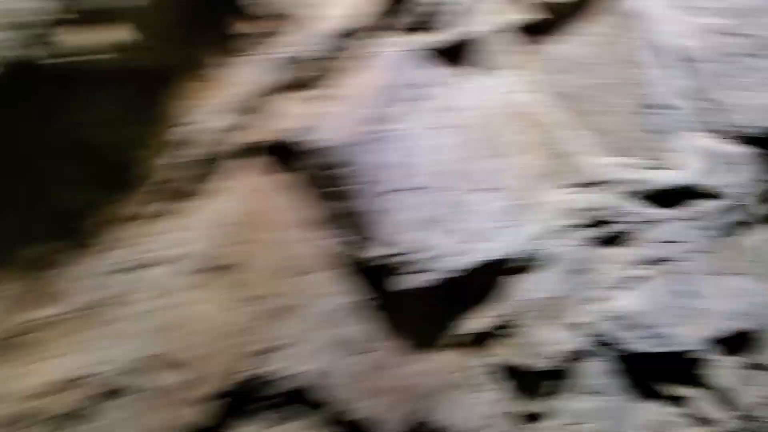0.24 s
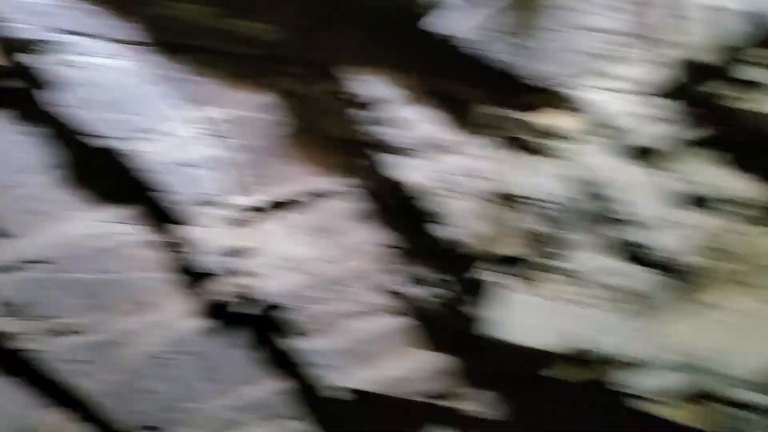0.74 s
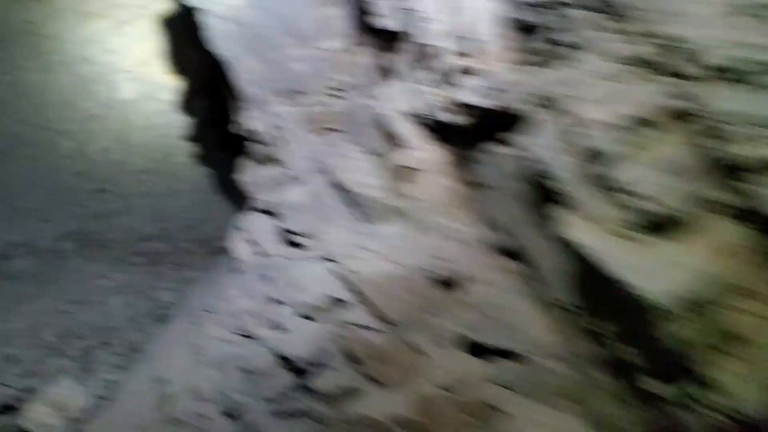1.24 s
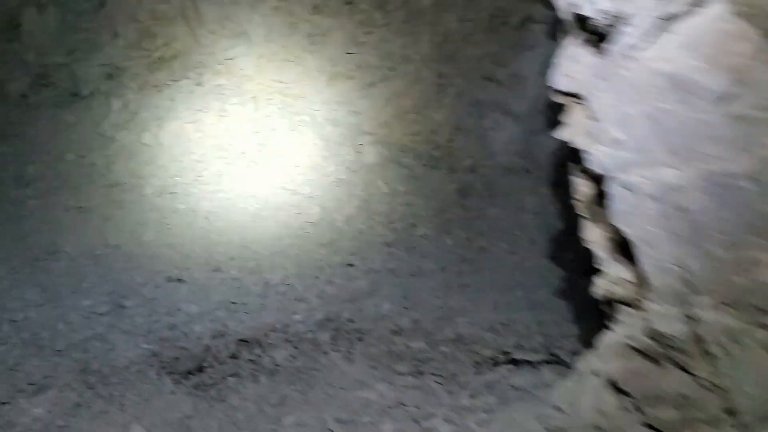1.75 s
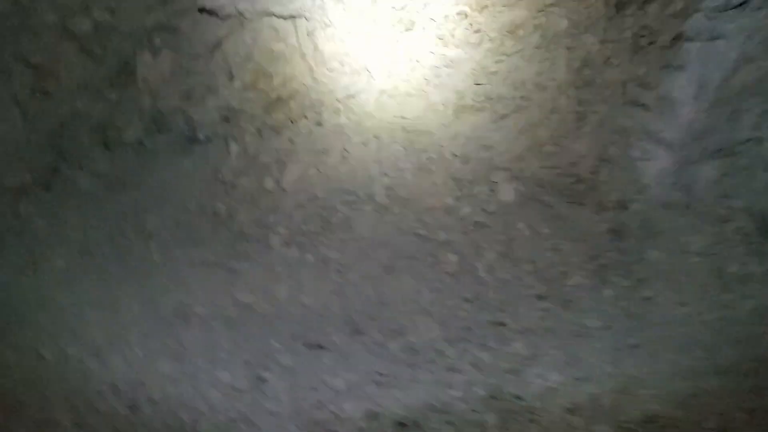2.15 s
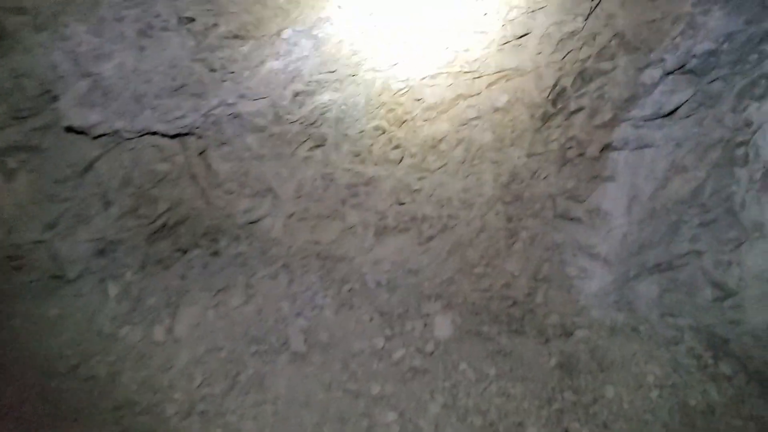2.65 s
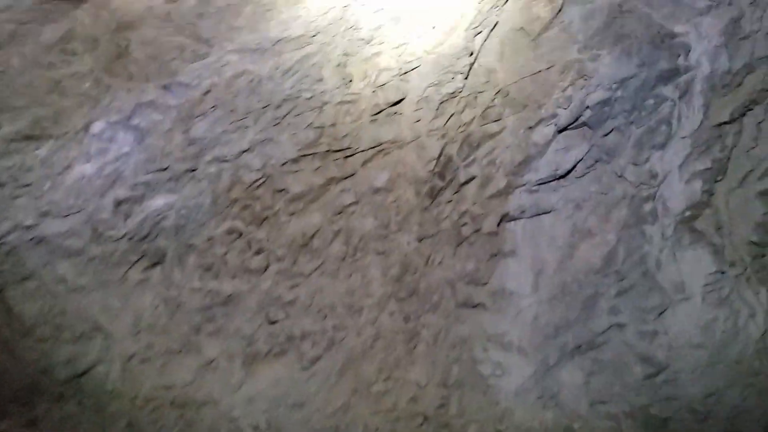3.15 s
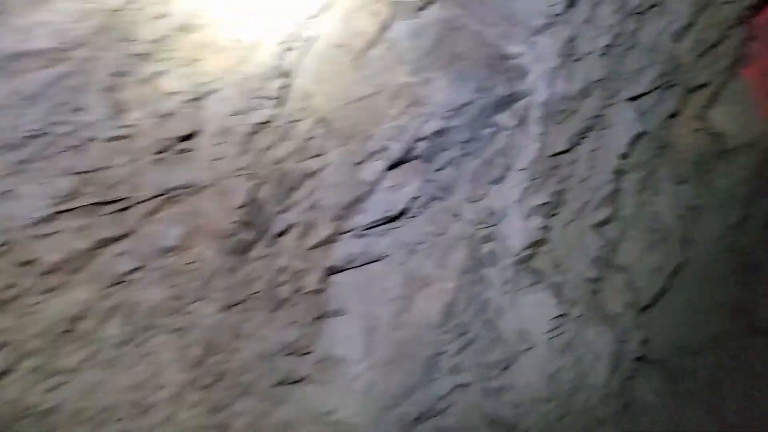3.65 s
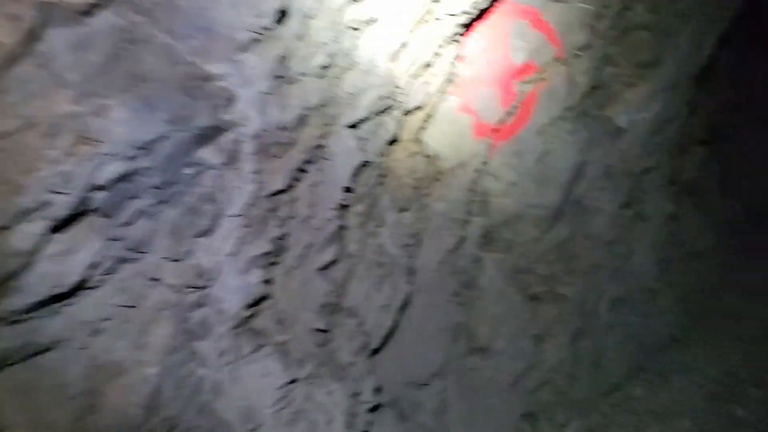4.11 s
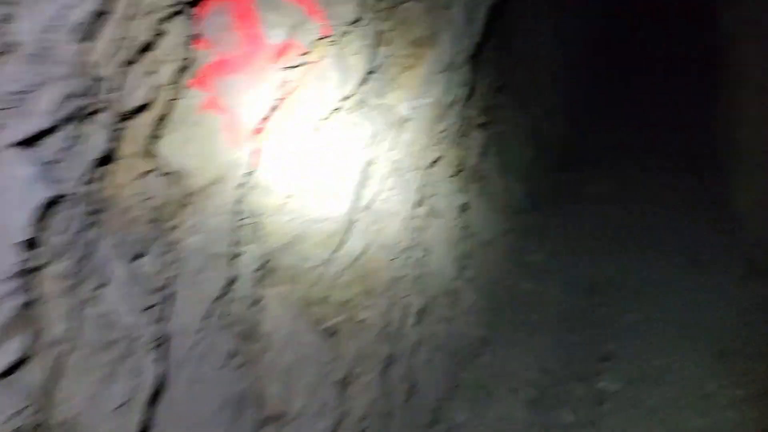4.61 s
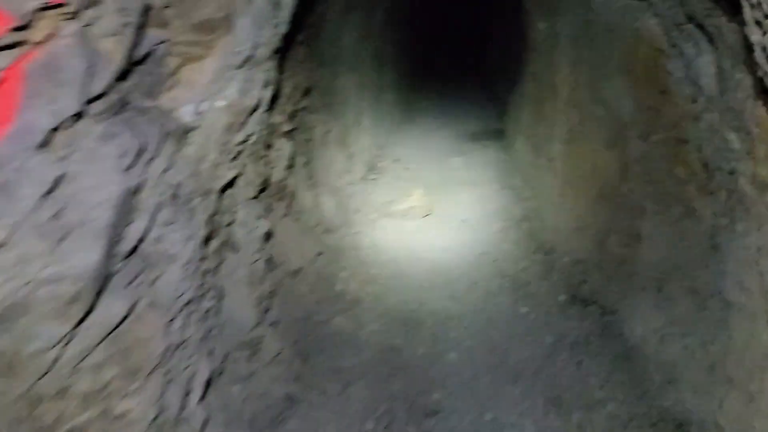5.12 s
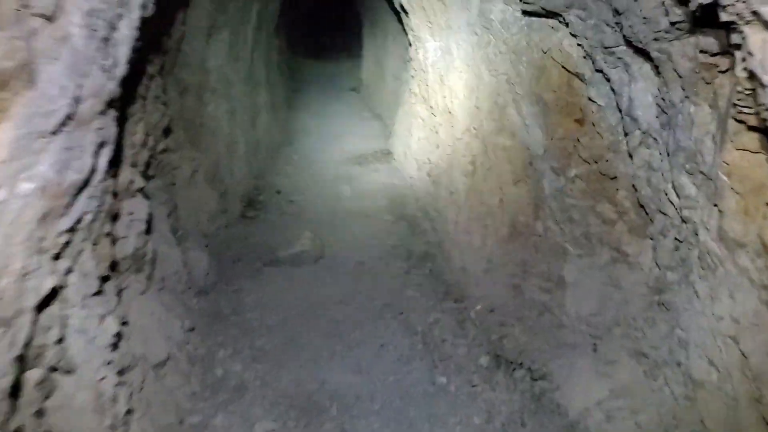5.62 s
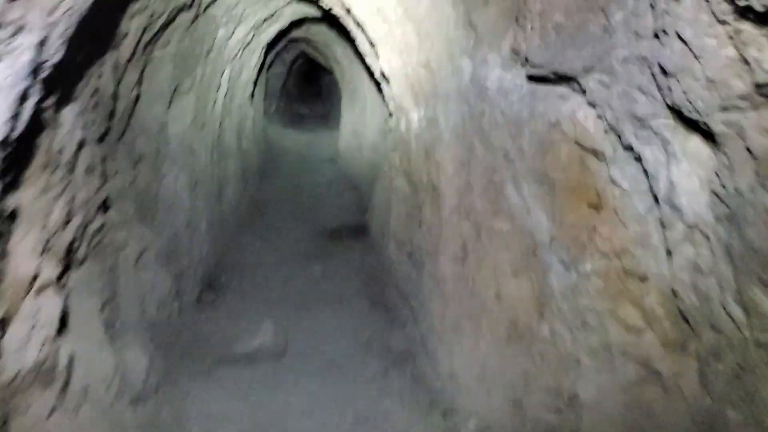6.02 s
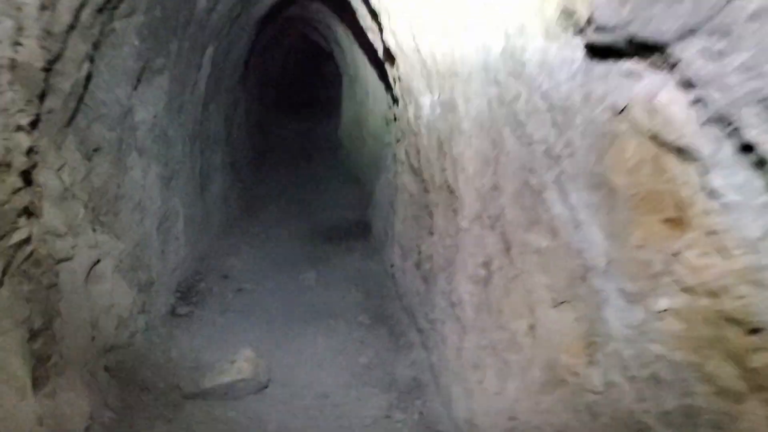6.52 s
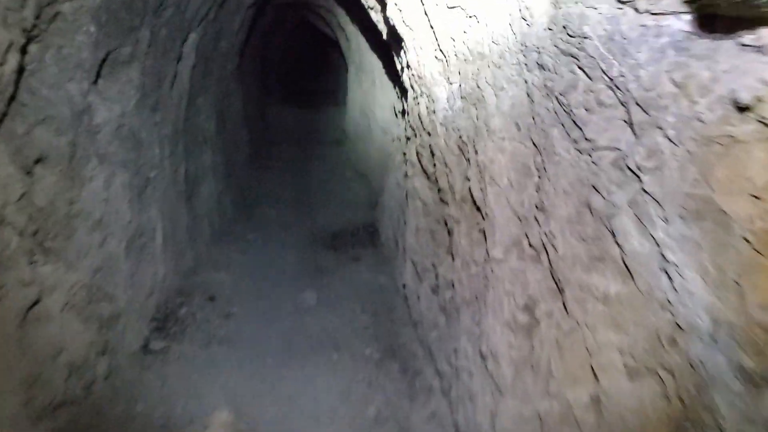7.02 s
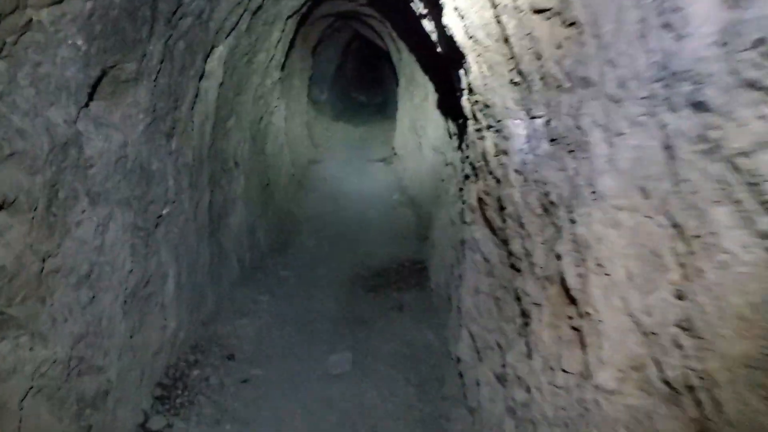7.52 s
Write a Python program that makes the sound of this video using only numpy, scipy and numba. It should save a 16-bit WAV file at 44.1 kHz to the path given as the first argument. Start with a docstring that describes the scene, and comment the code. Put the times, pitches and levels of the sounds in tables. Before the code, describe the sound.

A close, hand-held perspective in a narrow rock tunnel, with faint low rumble and soft hiss throughout. From 0 to 2 s boots shuffle on loose stones: a soft thud at the start, small clicks and knocks around 0.4-0.8 s, then a brighter gravel slip near 1.2 s. At about 2.1 s a heavier step crunches down, with further steps near 2.9 and 3.5 s, the latter with a sharp rock knock. Around 4.4-4.6 s a thud and several hollow clacks stand out. Dense, bright crunches follow at 5.2-5.4, 5.9 and 6.5 s, then clacking stones at 7.1 s and a last short step near 7.7 s. Small stones and grit trickle between steps. The walls give a short tail; the left side is open and crisp, the right muffled, with low handling bumps.

```python
"""In a narrow mine tunnel, over faint rumble and hiss, boots shuffle on loose rock and gravel, then
from about 2 s walk in heavier steps: each load of the ground is a crowd of ticks at their own pitches.
Heels and heavy rocks thud as low rings, single rocks knock and shed grit; the rock walls add a short tail.
The hand-held camera's left microphone is open and close to the direct sound; the grip muffles the right
one, dull and faint, but it feels the low bumps of the housing more strongly."""
import sys
import numpy as np
from scipy import signal
from scipy.fft import rfft, irfft, next_fast_len
from scipy.io import wavfile
from scipy.ndimage import uniform_filter1d
from numba import njit

SR = 44100
rng = np.random.default_rng(int(sys.argv[2]) if len(sys.argv) > 2 else 0)


def transcribe(signal):
    """Save signal, clipped to [-1, 1], as a 16-bit WAV file at the path in sys.argv[1]."""
    frames = np.atleast_2d(signal).T
    limited = np.clip(frames, -1, 1)
    pcm = np.round(limited * 32767).astype(np.int16)
    wavfile.write(sys.argv[1], SR, pcm)


N = 342304


def undb(db):
    """dB to gain."""
    return 10 ** (np.asarray(db) / 20)


def on_log(hz, table, axis=1):
    """Read one column of a table on a log-frequency axis."""
    table = np.array(table)
    return np.interp(np.log(np.maximum(hz, 1)), np.log(table[:, 0]), table[:, axis])


def colour(x, table, axis=1):
    """Filter by a table of dB against frequency."""
    size = next_fast_len(N)
    gain = undb(on_log(np.fft.rfftfreq(size, 1 / SR), table, axis))
    return irfft(rfft(x, size) * gain, size)[:N]


def walk(rate):
    """Wandering level: a new random value every 1 / rate s, joined by slewing."""
    k = int(SR / rate)
    held = np.repeat(rng.standard_normal(N // k + 1), k)
    return uniform_filter1d(held, k)[:N]


@njit
def ring(n, start, turn, decay, size, rise):
    """Sum of decaying sines that swell over a brief contact; turn in radians, decay in nepers a sample."""
    out = np.zeros(n)
    for k in range(len(start)):
        z, p = size[k] + 0j, np.exp(1j * turn[k] - decay[k])
        soft, q = 1., np.exp(-rise * decay[k])
        for i in range(start[k], min(n, start[k] + int(6 / decay[k]))):
            out[i] += z.imag * (1 - soft)
            z, soft = z * p, soft * q
    return out


def ticks(s, hz, t60, size, rise=7.9):
    """Short rings at times s; a larger rise shortens the contact relative to the decay."""
    start = (s * SR).astype(np.int64)
    return ring(N, start, 2 * np.pi * hz / SR, np.log(1000) / (t60 * SR), size, 1. * rise)


# still air and circuit hiss at each microphone, before its swell: pitch_hz, left_db, right_db [dB per Hz]
STILL_AIR = [(20, -57, -107), (44, -71, -73.5), (67.5, -67.5, -64.5), (110, -83, -93), (275, -90.5, -102),
             (820, -99.5, -115), (1980, -108, -120), (6300, -104, -128), (7360, -118, -133),
             (10200, -114, -130), (14500, -124, -125)]


def still_air(swell_db=2.5, swell_hz=3.8):
    """Faint rumble and hiss: coloured noise, unrelated at the two ports, swelling a little."""
    ports = []
    for column in (1, 2):
        noise = colour(rng.standard_normal(N), STILL_AIR, axis=column) * np.sqrt(SR / 2)
        ports.append(noise * undb(swell_db * walk(swell_hz)))
    return np.array(ports)


# a boot loads the gravel: start_s (weight lands), rise_s, hold_s, level_db (grit, relative),
# change_db (grit, over the hold), coarse_db (coarse stones above grit)
STEPS = [(0.512, 0.04, 0.1, -68.5, 4, 16.5), (1.049, 0.11, 0.14, -60, -14, 15.5),
         (1.198, 0.03, 0.11, -45, -13, 9), (1.399, 0.098, 0.088, -52.5, -1.5, 11.5),
         (2.108, 0.097, 0.03, -44.5, 4.5, 7.5), (2.178, 0.038, 0.17, -34.5, -13.5, 3),
         (2.617, 0.028, 0.037, -48.5, -20, 4), (2.9, 0.049, 0.13, -41.5, 5, 7),
         (3.518, 0.034, 0.031, -47, -8, 12), (3.671, 0.16, 0.14, -52.5, 7, 8),
         (4.441, 0.012, .2, -38, -6.5, 6), (4.837, 0.009, 0.18, -54, -8.5, 8.5),
         (5.188, 0.054, 0.046, -33, -5.5, 0), (5.307, 0.083, 0.023, -31.5, -8.5, 9.5),
         (5.38, .03, 0.14, -51.5, 2.5, -25), (5.926, 0.045, 0.13, -37, 3.5, 9.5),
         (6.534, 0.061, 0.087, -31.5, -1.5, 8.5), (7.077, 0.32, 0.053, -44, -3, 10),
         (7.152, 0.033, 0.1, -36, -2, 6.5), (7.678, 0.011, 0.023, -45.5, -13, 13.5)]
# faint shuffle of shifting feet between the steps: start_s, level_db (grit, relative)
SHUFFLE = [(0, -56.5), (0.25, -94), (0.45, -64), (0.92, -68.5), (1.6, -58.5), (1.9, -76), (2.05, -61.5),
           (2.8, -59.5), (3.42, -64.5), (3.9, -70.5), (4.35, -70), (4.42, -57), (5.1, -60.5), (5.75, -59),
           (6.4, -57), (6.85, -62.5), (7.76, -63)]
SHUFFLE_COARSE_DB = 5
RISE_DB, RELEASE_DB_PER_S = 30, 253  # climb during the rise; fall once the boot lifts
COARSE_GROWTH_DB_PER_S = 10  # coarse stones give way later than the grit
MIDDLE_LOAD_DB = -41  # grit level at which the ground has its plain colour


def load(s):
    """Grit level and coarse share (dB) at times s: each step rises, holds and releases over the shuffle."""
    start, rise, hold, db, change_db, coarse_db = (c[:, None] for c in np.transpose(STEPS))
    since = s - start
    grit = db + RISE_DB * np.minimum(since, 0) / rise
    grit = grit + change_db * np.clip(since / hold, 0, 1)
    grit = grit - RELEASE_DB_PER_S * np.maximum(since - hold, 0)
    coarse = grit + coarse_db + COARSE_GROWTH_DB_PER_S * np.maximum(since, 0)
    shuffle = np.interp(s, *np.transpose(SHUFFLE))

    def total(steps, under):
        """Add the powers of all the steps and the shuffle under them."""
        return 10 * np.log10(np.sum(undb(steps) ** 2, axis=0) + undb(under) ** 2)

    grit_db = total(grit, shuffle)
    return grit_db, total(coarse, shuffle + SHUFFLE_COARSE_DB) - grit_db


# colour of the stones' ticks: pitch_hz, level_db (relative)
STONES = [(70, 10), (160, -7), (420, 0.5), (850, 0.5), (1600, -5.5), (3000, -5), (6000, -1.5),
          (10000, -11.5), (16000, -22)]
COARSE_HZ = 1800  # stones pitched below this count as coarse, with a gradual border


def stone_size(hz, coarse_db):
    """Amplitude of a tick by its pitch; the coarse stones have their own share of the load."""
    coarse = 1 / (1 + (hz / COARSE_HZ) ** 4)
    return hz / 1000 * undb(on_log(hz, STONES) + coarse * coarse_db)


def pitch(u):
    """Even spread over the octaves of the stone table."""
    return STONES[0][0] * (STONES[-1][0] / STONES[0][0]) ** u


def bursts(per_s=70, fade_s=0.017, rest=0.36):
    """Log level of sudden slips at random moments that die away; mean 0, spread 1."""
    slips = (rng.random(N) < per_s / SR) * rng.random(N)
    fading = signal.lfilter([1], [1, -np.exp(-1 / (fade_s * SR))], slips)
    level = np.log(rest + fading)
    return (level - level.mean()) / level.std()


# a heavier load sounds brighter: dB gained per dB of grit level above the middle load
DEEP_HZ, DEEP_PER_DB, FINE_HZ, FINE_PER_DB = 326, -0.75, 7950, 0.27


def gravel(count=50000, cycles=9.45, scatter_db=2.0, slip_db=3.0, patch_db=2.6, gain_db=-3):
    """Dense ticks under the sole: few are large, all slip in shared bursts, each octave comes in patches."""
    when, size_u, large_u, clear_u = rng.random((count, 4)).T
    size_u = np.maximum(size_u, 1e-3)
    s, hz = when * N / SR, pitch(size_u ** .35)
    thin = size_u ** .325  # small stones are more numerous, so each carries less
    grit_db, coarse_db = load(s)
    index, octave = (s * SR).astype(int), np.log2(hz / STONES[0][0]).astype(int)
    large_db = scatter_db * np.minimum(-np.log(1 - large_u), 4.)
    patches = np.array([walk(40) for _ in range(8)])
    slips_db = slip_db * bursts()[index] + patch_db * patches[octave, index]
    deep = DEEP_PER_DB / (1 + (hz / DEEP_HZ) ** 4)
    fine = FINE_PER_DB / (1 + (FINE_HZ / hz) ** 4)
    db = grit_db + (deep + fine) * (grit_db - MIDDLE_LOAD_DB) + slips_db + large_db + gain_db
    long = 4 ** (clear_u - .5)  # some stones ring clearer than others
    size = stone_size(hz, coarse_db) * undb(db) / thin / np.sqrt(long)
    return ticks(s, hz, cycles * long / hz, size)


# heels and heavy rocks thudding on the ground: start_s, level_db (relative), pitch_hz
THUDS = [(0.048, -31.5, 112), (2.111, -27.5, 280), (3.785, -33, 167), (4.471, -23, 163), (4.84, -31, 133),
         (5.156, -33, 139), (5.347, -32, 93.5), (5.932, -24.5, 110), (6.059, -26, 110)]


def thuds(t60=0.14, gain_db=3):
    """Dull low rings of the packed ground."""
    s, db, hz = np.transpose(THUDS)
    return ticks(s, hz, t60 + 0 * s, undb(db + gain_db), rise=2.3)


# clear jolts of the housing in the hand: start_s, level_db (relative)
JOLTS = [(0.068, -31), (2.015, -30), (2.24, -25), (2.934, -24.5), (4.853, -30), (4.929, -32.5),
         (5.148, -28), (5.32, -36), (5.903, -31), (6.624, -36), (7.244, -24.5)]
BUMP_HZ, BUMP_T60_S = 54.7, 0.14  # central pitch, spread from bump to bump; ring time
BUMP_PER_DB = 0.6  # small jolts grow with the crunch, dB per dB


def bumps(count=400, small_db=-50, scatter_db=9.0, right_db=5, clear_right_db=8):
    """The housing rocks in the hand at a low pitch: clear jolts at both ports, many small ones at each alone."""
    s, db = np.transpose(JOLTS)
    ports = []
    for side in (1, -1):  # left, right
        when, pitch_u, large_u = rng.random((count, 3)).T
        small_s = when * N / SR
        small = small_db + BUMP_PER_DB * (load(small_s)[0] - MIDDLE_LOAD_DB)
        small = small - side * right_db / 2 + scatter_db * np.minimum(-np.log(1 - large_u), 3)
        at = np.r_[s, small_s]
        hz = BUMP_HZ * np.r_[.8 + .5 * rng.random(len(s)), .6 + 1.1 * pitch_u]
        size = undb(np.r_[db - side * clear_right_db / 2, small])
        ports.append(ticks(at, hz, BUMP_T60_S + 0 * at, size, rise=1.36))
    return np.array(ports)


def loose_stones(count=150, above_db=9, buried_db=-45):
    """Small stones roll off at random moments, heard best when the load is light: rows like ROCKS."""
    when, level_u, body_u, grit_u = rng.random((count, 4)).T
    s = when * N / SR
    db = np.minimum(load(s)[0], buried_db) + above_db + 8 * level_u
    return np.transpose([s, db, 350 * 5 ** body_u, -6 + 0 * s, 2500 * 4 ** grit_u])


# single rocks kicked or cracked: start_s, level_db (relative), pitch_hz (body, about),
# grit_db (share of grit, relative), grit_hz
ROCKS = [(0.372, -41.5, 1380, -2, 3860), (0.393, -37, 827, -7.5, 6100), (0.513, -36, 463, -9, 2510),
         (0.542, -34.5, 1520, -11, 5530), (0.575, -34, 560, -9, 2560), (0.635, -34, 472, -0.5, 5250),
         (0.736, -33, 417, -4, 5600), (0.802, -43, 1060, -3.5, 3660), (0.97, -35.5, 363, -9.5, 4140),
         (1.047, -28, 864, -14.5, 3440), (2.109, -25, 1376, -18, 2650), (2.324, -38, 497, 4.5, 6100),
         (2.679, -35.5, 516, -3.5, 3480), (2.755, -34, 396, -3.5, 5450), (2.816, -48, 900, 6, 4500),
         (2.895, -29, 334, 4, 5650), (3.173, -40, 603, 0, 3500), (3.211, -30.5, 602, -3, 3370),
         (3.474, -42, 577, -8.5, 3100), (3.517, -21, 693, -20, 6290), (3.658, -33.5, 380, 3.5, 3250),
         (4.436, -21.5, 485, -6, 3550), (4.532, -20, 880, -32, 3940), (4.576, -20.5, 875, -23, 2850),
         (4.611, -17, 883, -20, 5800), (4.837, -24.5, 479, 2, 9500), (4.875, -29, 884, -20, 2920),
         (5.165, -30.5, 1120, -17, 5300), (5.389, -28.5, 455, 2.5, 5500), (5.449, -29.5, 597, -8, 4000),
         (5.527, -42.5, 430, 12.5, 4260), (5.593, -47.5, 430, 15, 10900), (5.646, -43.5, 447, 7.5, 3090),
         (5.707, -34.5, 430, -6, 5560), (5.805, -41, 450, 0.5, 2820), (5.846, -32, 1000, -1, 2200),
         (5.922, -28.5, 517, 11, 2450), (6.069, -21.5, 960, -18, 4000), (6.346, -35.5, 685, -6, 3000),
         (6.518, -20, 410, -1.5, 3160), (6.745, -47, 300, 9.5, 5160), (7.07, -39, 440, 6, 4800),
         (7.097, -31.5, 415, 8, 4670), (7.139, -20, 896, -25, 2810), (7.177, -18.5, 750, -19, 4500),
         (7.67, -30.5, 820, -10, 11200)]


def knocks(rows, count=70, cycles=16, chips_db=-6, chips_t60=0.11, crowd=2.6, spread=0.38,
           broad_db=-7, side_db=8.5, body_cycles=30):
    """A rock rings at a few pitches, loudest near its main one, and sheds a fading spray of grit."""
    s, db, hz, grit_db, grit_hz = (c[:, None] for c in np.transpose(rows))
    when, pitch_u = rng.random((len(rows), 2, count)).transpose(1, 0, 2)
    modes = hz * np.array([.62, 1, 1.08, 1.7]) * (0.967 + 0.064 * pitch_u[:, :4])
    struck = s + 0.00412 * when[:, :4] ** 2
    body_t60 = body_cycles / np.sqrt(1000 * modes)
    body_size = undb(db - side_db * np.abs(np.log2(modes / hz)))
    body = ticks(struck.ravel(), modes.ravel(), body_t60.ravel(), body_size.ravel(), rise=7.4)
    late = when ** crowd * chips_t60 / 2  # chips crowd towards the blow
    chip_hz = pitch(.5 + .5 * pitch_u)
    near = np.exp(-(np.log2(chip_hz / grit_hz) / spread) ** 2) + undb(broad_db)
    size = near * stone_size(chip_hz, 0) * undb(db + grit_db + chips_db - 60 * late / chips_t60)
    spray = ticks((s + late).ravel(), chip_hz.ravel(), cycles / chip_hz.ravel(), size.ravel(), rise=9.4)
    return body + spray


# how long the rock walls hold the sound: pitch_hz, t60_s
TUNNEL = [(110, 0.97), (300, 0.22), (1400, 0.14), (4000, 0.03), (10000, 0.16)]
TUNNEL_DB = -3  # relative level of the tail
GRIP_LAG_S, GRIP_DIRECT = .0002, .2  # mean delay at the right port; gain of its direct sound before the grip


def walls():
    """One place's echo pattern at both ports: direct sound, then a dense tail that is alike in the bass."""
    t = np.arange(SR // 2) / SR
    tail = 0
    for hz in 63 * 2. ** np.arange(8):
        top = min(hz * np.sqrt(2) * (1 + (hz > 8000)), .45 * SR)  # the last band reaches higher
        band = signal.butter(2, [hz / np.sqrt(2), top], "bandpass", fs=SR, output="sos")
        common, own = signal.sosfilt(band, rng.standard_normal((2, len(t))))
        t60, apart = on_log(hz, TUNNEL), min(np.sqrt(hz / 1300), 1)
        fade = undb(TUNNEL_DB - 60 * t / t60) * np.minimum(t / 0.0048, 1) / np.sqrt(t60 * SR / 14)
        right = np.sqrt(1 - apart ** 2) * common + apart * own
        tail = tail + fade * np.array([common, right])
    tail[0, 0] += 1
    tail[1, 0] += GRIP_DIRECT
    lag = int(GRIP_LAG_S * SR * 2 * rng.random())  # the right port hears the stones slightly later
    tail[1] = np.roll(tail[1], lag)
    return tail


# air resonances across the tunnel: pitch_hz, width_hz, level_db
TUNNEL_MODES = [(393.6, 15, -1.5)]


def tunnel(x, count=9, hold_s=.03):
    """Stones sound at ever-changing places, each with its own echoes; the low air resonances are shared."""
    hold = int(hold_s * SR)
    place = np.repeat(rng.integers(count, size=N // hold + 1), hold)[:N]
    heard = 0
    for k in range(count):
        here = x * uniform_filter1d(1. * (place == k), hold // 2)  # crossfade between places
        heard = heard + signal.fftconvolve(here[None], walls(), axes=1)[:, :N]
    for hz, width, db in TUNNEL_MODES:
        heard = heard + undb(db) * signal.lfilter(*signal.iirpeak(hz, hz / width, fs=SR), x)
    return heard


# the left port partly cancels a band: pitch_hz, width_hz, depth [0-1]
PORT_NOTCH = (7547, 2180, 0.85)
# the grip muffles the right port: pitch_hz, level_db
GRIP = [(60, -8), (130, -9.5), (380, -13.5), (2400, -12.5), (3600, -16), (4300, -31), (5500, -35),
        (7500, -42), (15000, -27)]


def scene():
    """Stones reach the open left port with a notch and the right port through the grip."""
    stones = gravel() + thuds() + knocks(loose_stones(), count=30) + knocks(ROCKS)
    left, right = tunnel(stones)
    hz, width, depth = PORT_NOTCH
    left = left - depth * signal.lfilter(*signal.iirpeak(hz, hz / width, fs=SR), left)
    return np.array([left, colour(right, GRIP)]) + bumps() + still_air()


def record(dry):
    """The camera cuts the deepest bass (below 42 Hz) and the top (above 15850 Hz)."""
    dry = signal.sosfilt(signal.butter(3, 42, "highpass", fs=SR, output="sos"), dry)
    return signal.sosfilt(signal.ellip(10, .2, 70, 15850, fs=SR, output="sos"), dry)


dry = scene()
out = record(dry)
transcribe(out)
```